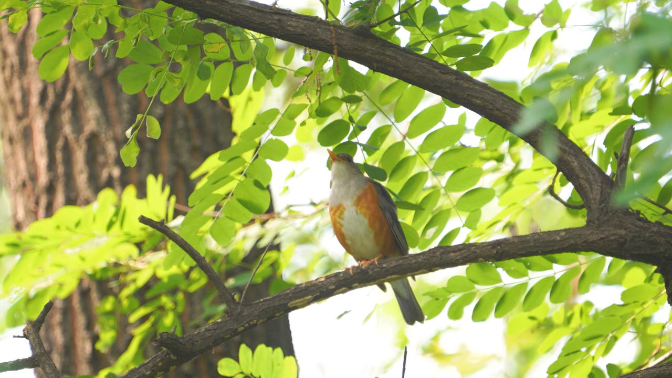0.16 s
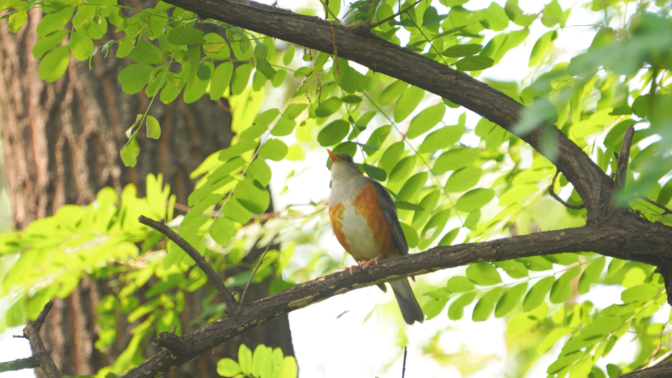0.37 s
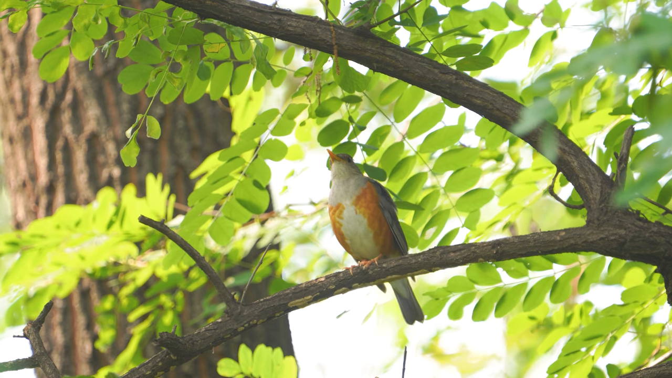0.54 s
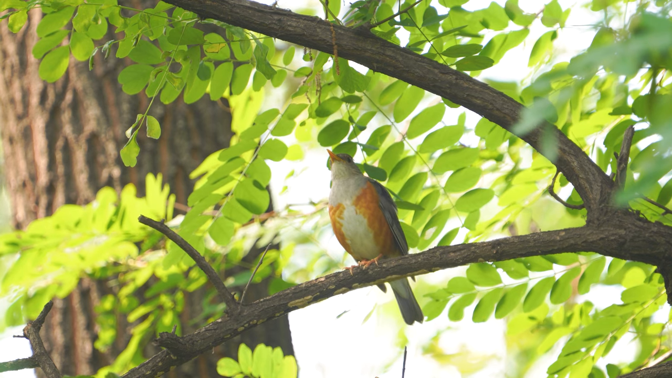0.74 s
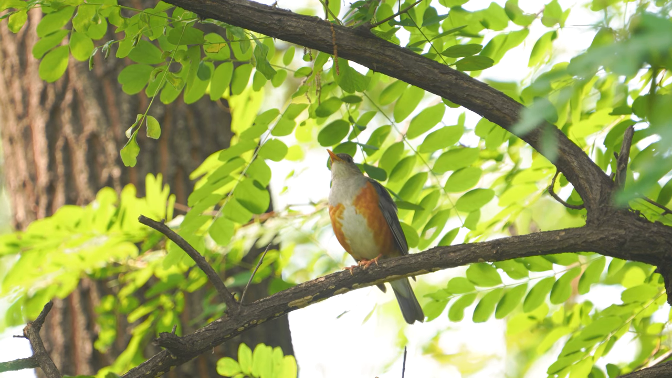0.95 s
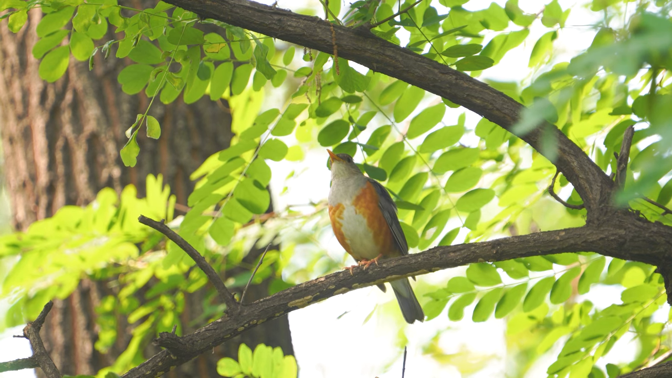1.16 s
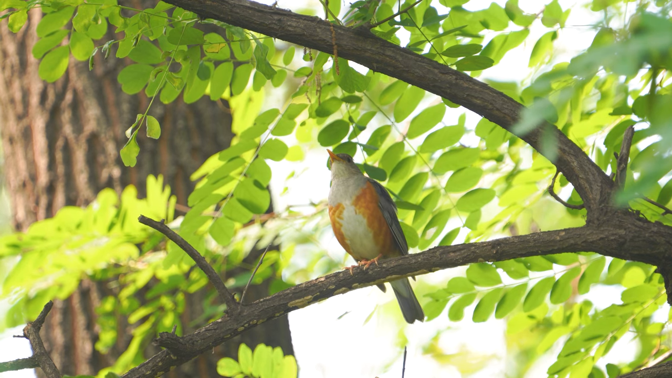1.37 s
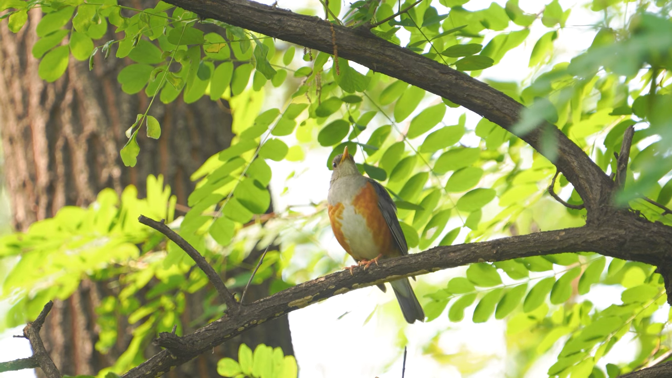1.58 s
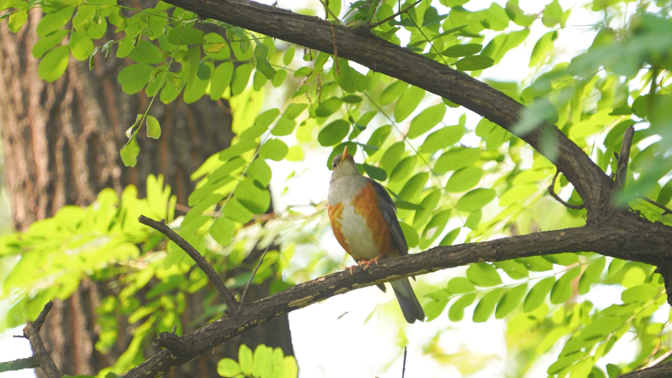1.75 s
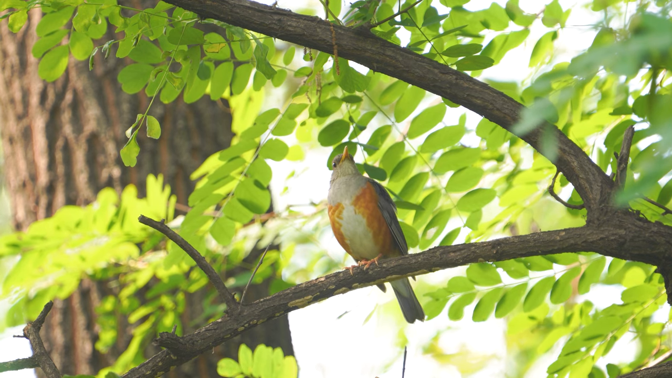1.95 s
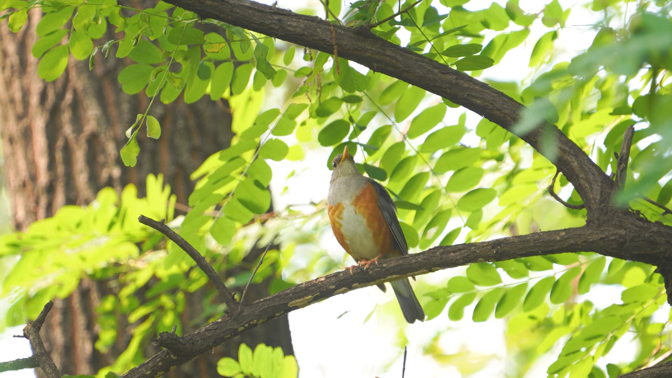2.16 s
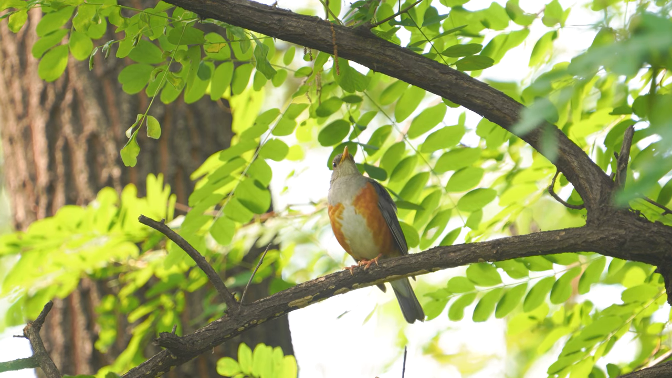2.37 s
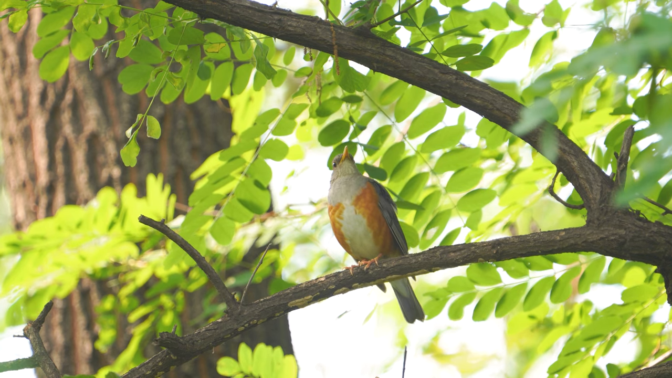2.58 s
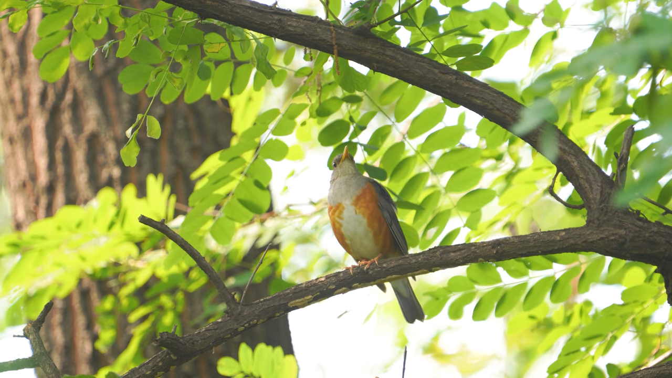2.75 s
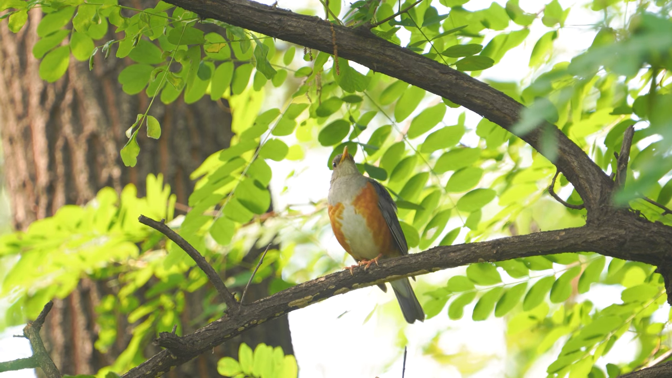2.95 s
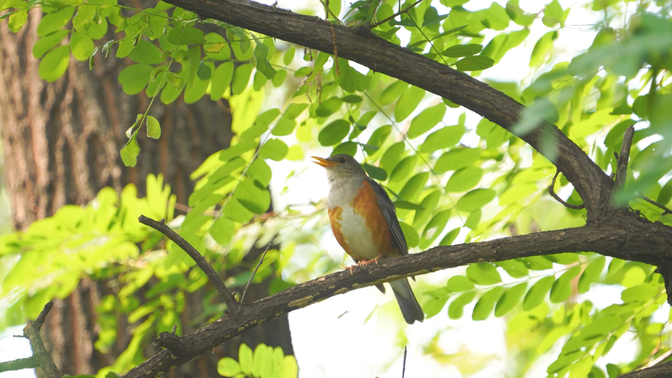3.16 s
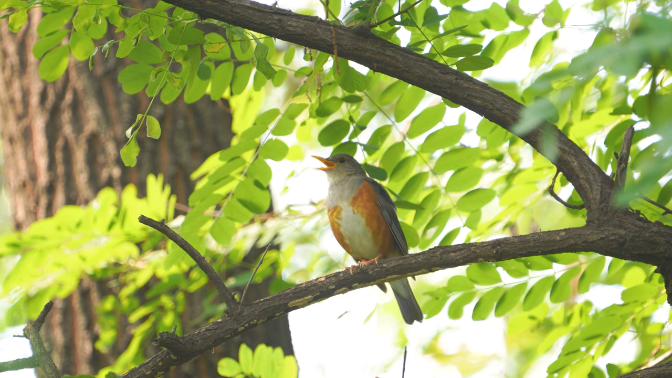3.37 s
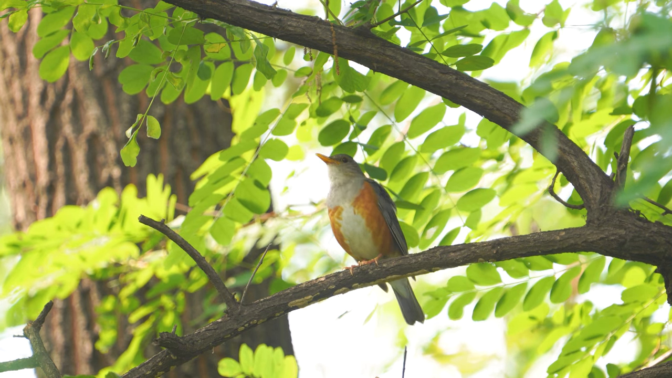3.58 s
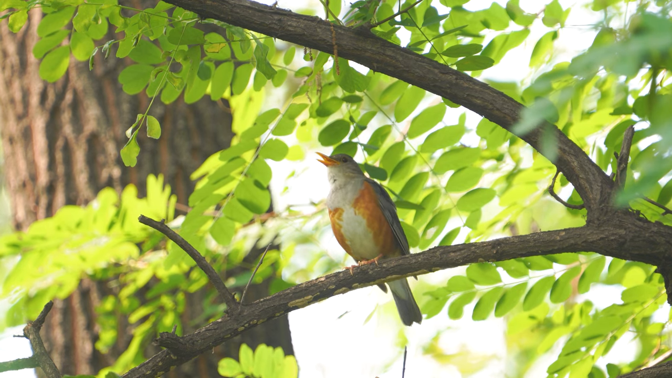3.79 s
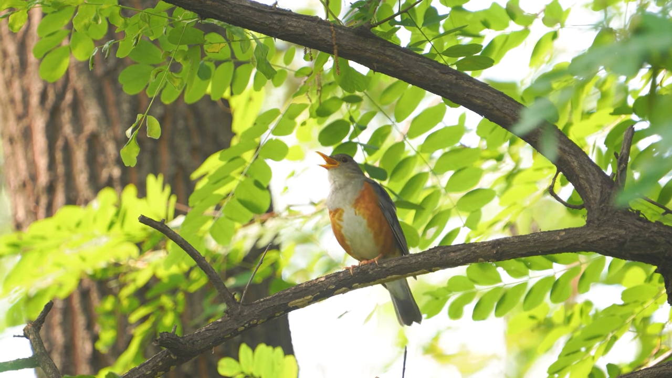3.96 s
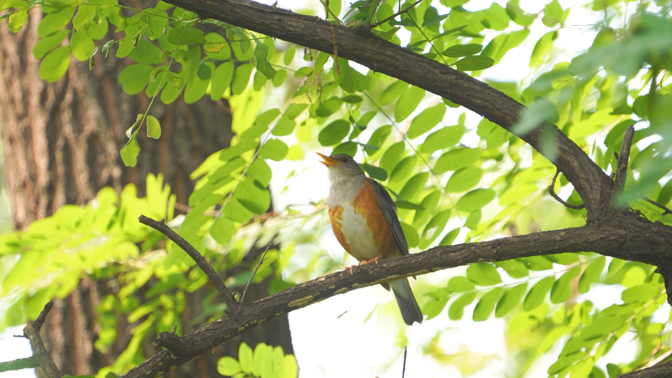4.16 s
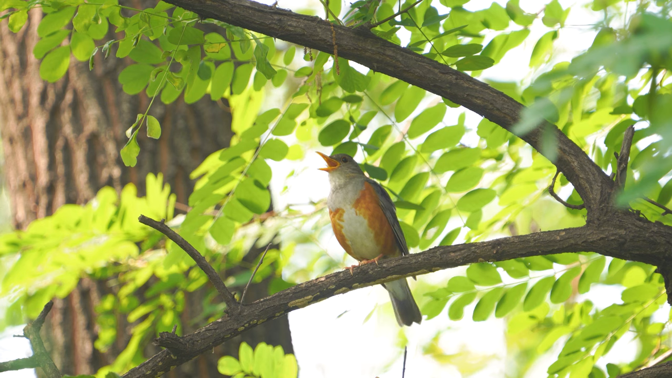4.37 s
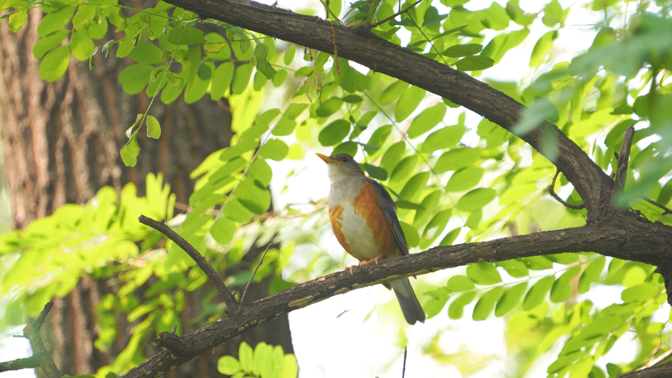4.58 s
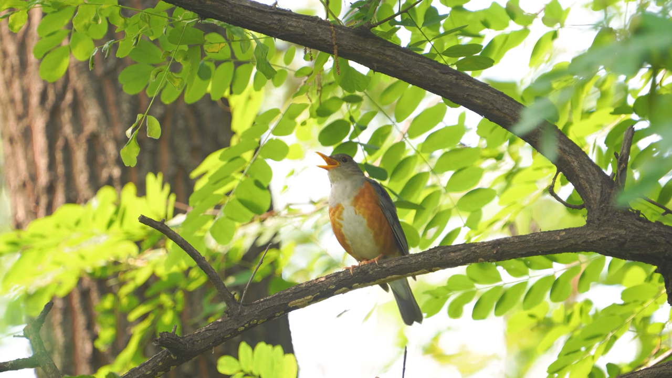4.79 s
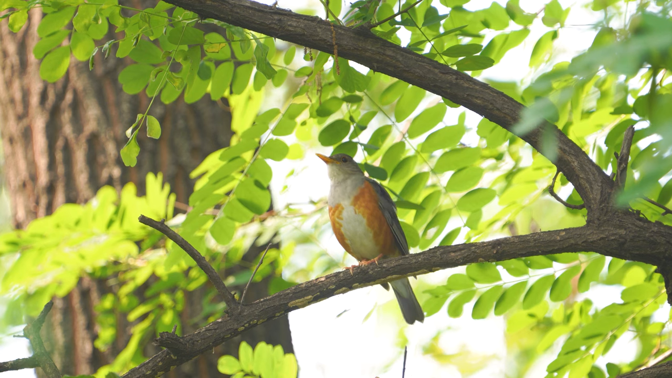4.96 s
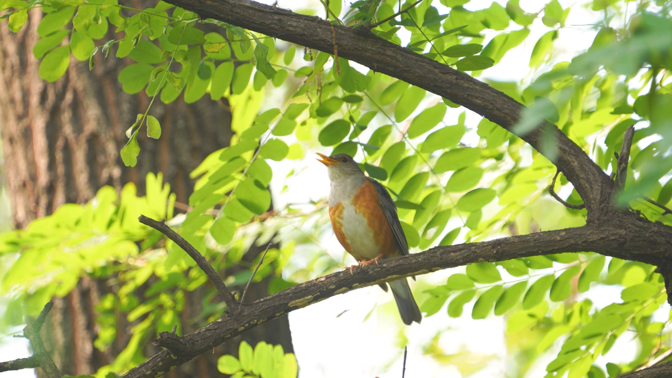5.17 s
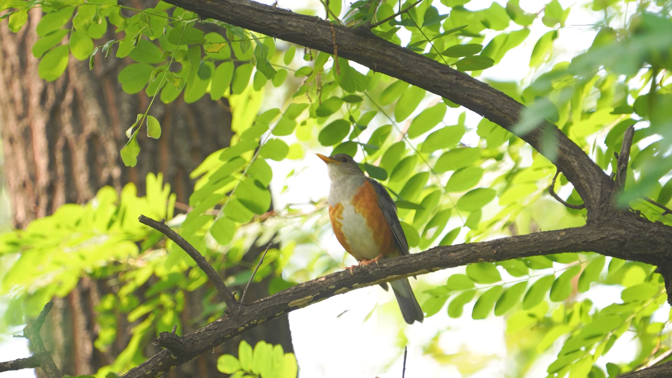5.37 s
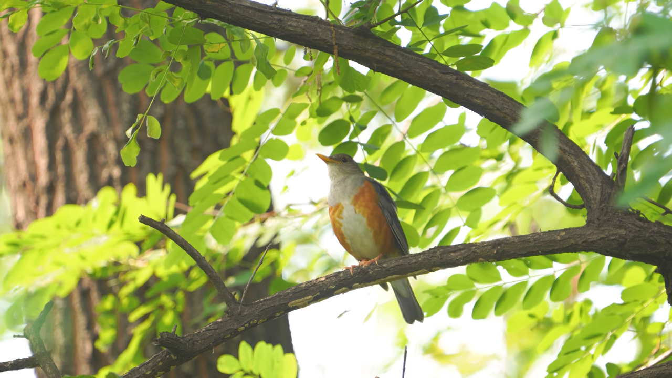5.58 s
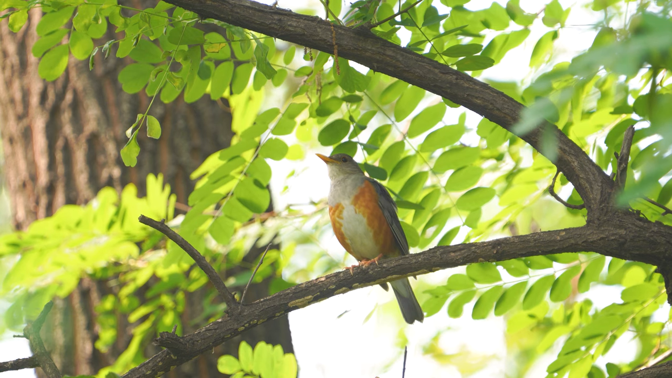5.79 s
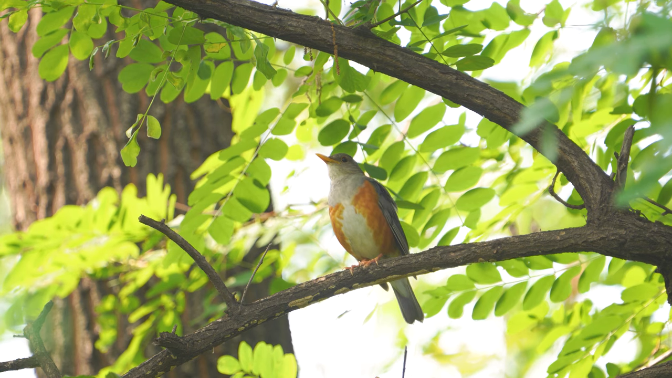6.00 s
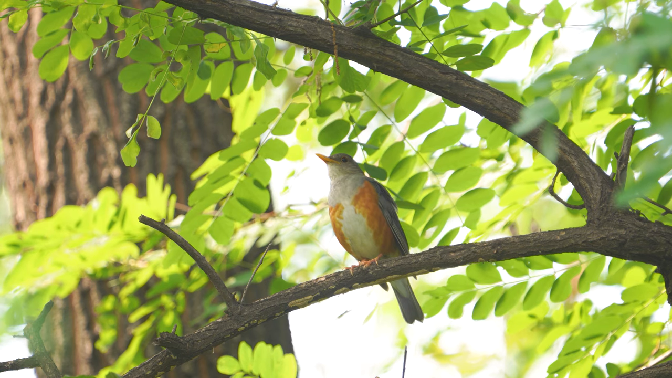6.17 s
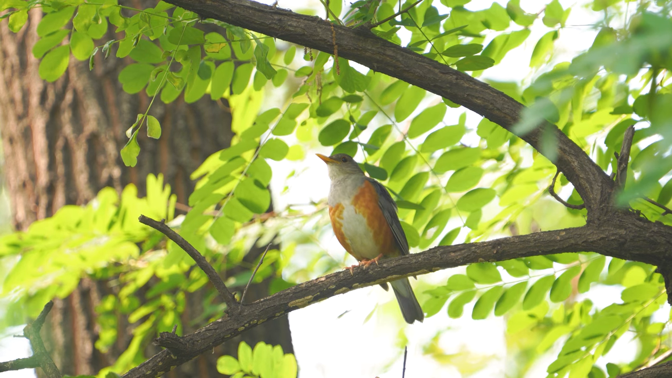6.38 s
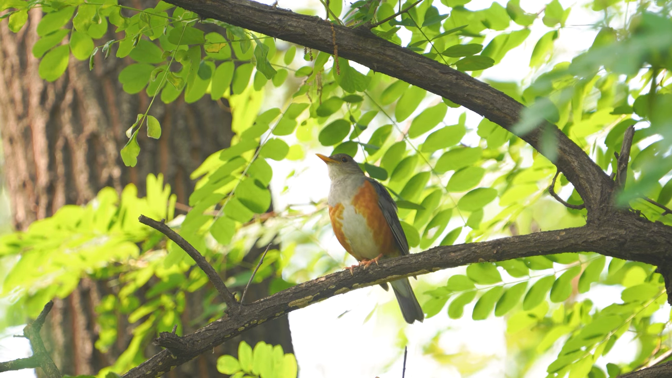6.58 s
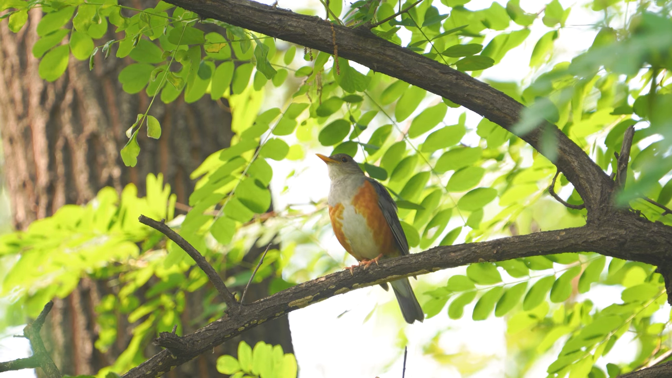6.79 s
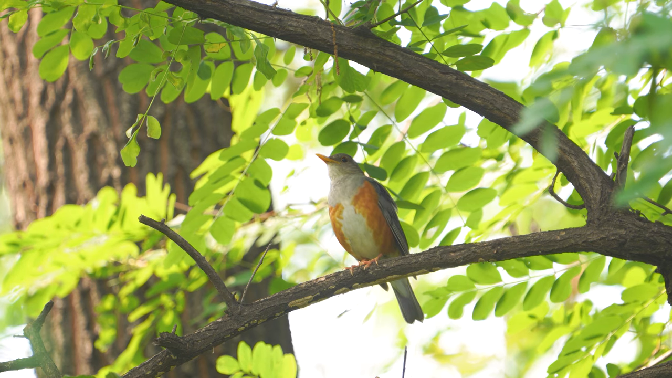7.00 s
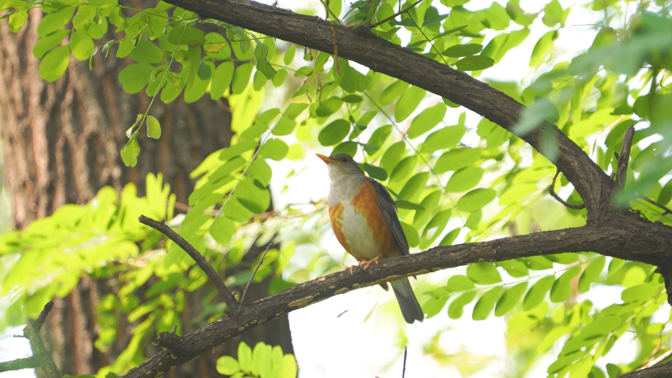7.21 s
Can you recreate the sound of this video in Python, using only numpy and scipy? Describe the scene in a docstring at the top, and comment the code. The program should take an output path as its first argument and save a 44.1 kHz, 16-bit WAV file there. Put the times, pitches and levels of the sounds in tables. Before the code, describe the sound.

Quiet chips, a pause, then a bright burst of bird whistles and rapid trills fading into high twitters, with distant chirps and a faint caw.

```python
"""A thrush sings in a wood: soft chips, four falling slurs, loud whistles, a warble and trills, then a thin twitter.
Its syrinx is a nearly pure gliding tone with weak overtones, and two notes at times sound together.
Leaves and trunks scatter each note into a short tail, built from many small random echoes.
Behind it are distant birds, scattered chirps and a pulsed caw, and a few dry ticks, which are resonant noise bursts.
Faint insects are narrow bands of noise; the air is a low far-off rumble with a little hiss."""
import sys
import numpy as np
from scipy import signal
from scipy.io import wavfile
from scipy.ndimage import uniform_filter1d

SR = 44100
rng = np.random.default_rng(int(sys.argv[2]) if len(sys.argv) > 2 else 0)


def dump_mix(stems):
    """Bounce the given channels to the path in sys.argv[1] as a 16-bit WAV at rate SR."""
    frames = np.atleast_2d(stems).T  # one column per channel
    limited = np.clip(frames, -1, 1)  # hard clip at full scale
    pcm = np.round(limited * 32767).astype(np.int16)
    wavfile.write(sys.argv[1], SR, pcm)


N = 319284
TIME = np.arange(N) / SR
CUTOFF_HZ = 15850


def from_db(db):
    """Decibels to gain."""
    return 10 ** (np.asarray(db) / 20)


def rms_one(x):
    """Scale to rms 1."""
    return x / np.sqrt(np.mean(x ** 2) + 1e-20)


def in_time(rows, at=TIME):
    """Read the columns of a curve at the given times in seconds."""
    s, *columns = np.transpose(rows)
    return [np.interp(at, s, column) for column in columns]


def at_hz(points, hz):
    """Read a spectrum on a log-frequency axis."""
    known_hz, values = np.transpose(points)
    return np.interp(np.log(hz), np.log(known_hz), values)


def panned(pan_db):
    """Left and right gains for a left minus right level in dB."""
    return from_db(np.array([[.5], [-.5]]) * pan_db)


def resonate(x, hz, width_hz):
    """One two-pole resonance with a gain of about 1 at its peak."""
    r = np.exp(-np.pi * width_hz / SR)
    zeros = np.array([1, 0, -1]) * (1 - r * r) / 2
    poles = [1, -2 * r * np.cos(2 * np.pi * hz / SR), r * r]
    return signal.lfilter(zeros, poles, x + 1e-18)


def waver(t, per_s):
    """Random drift around 0 at the times t: straight lines between normal draws of spread 1, per_s a second."""
    knots = rng.standard_normal(4096)
    return np.interp((t - t[0]) * per_s, np.arange(len(knots)), knots)


def scatter(x, t60, first_s, echoes_per_s):
    """Many small echoes that die away by 60 dB in t60 seconds, different at each ear; unit energy."""
    t = TIME[:SR]
    echoes = rng.standard_normal((2, SR)) * (rng.random((2, SR)) < echoes_per_s / SR)
    # silent until first_s, full density of energy from twice that
    echoes *= from_db(-60 * t / t60) * np.clip(t / first_s - 1, 0, 1)
    echoes /= np.sqrt(np.sum(echoes ** 2, axis=1, keepdims=True) + 1e-20)
    return signal.fftconvolve(x[None], echoes, axes=1)[:, :N]


# The bird turns its head. Each row: time in seconds, left minus right level of the song in dB;
# the leaves and the wood follow in proportion.
HEAD_TURN = [(1.0, -4), (2.45, -8), (3.14, -12), (3.23, -3.5), (3.6, -4.5), (4.1, -4), (5.4, -3.5)]
LAG_MS_PER_DB, LAG_FROM_DB, LAG_MAX_MS = 1, -5, .12   # the further right, the later at the left ear
WOOD_T60_S, LEAVES_T60_S = 0.6, 0.1


def thrush():
    """The song reaches the ears directly, off nearby leaves and from the wood; high notes scatter more."""
    low = from_db(-2.08) * (slurs() + trills() + warble() + whistles())
    high = from_db(-3.5) * (chips() + twitter())
    song = low + high
    pan_db, = in_time(HEAD_TURN)
    lag_ms = np.clip(LAG_MS_PER_DB * (LAG_FROM_DB - pan_db), 0, LAG_MAX_MS)
    left_ear = np.interp(TIME - lag_ms / 1000, TIME, song)
    direct = np.array([left_ear, song]) * panned(pan_db)
    to_leaves = from_db(-13) * low + from_db(-9) * high
    to_wood = from_db(-4) * low + from_db(-2.5) * high
    leaves = scatter(to_leaves, LEAVES_T60_S, first_s=.003, echoes_per_s=900)
    wood = scatter(to_wood, WOOD_T60_S, first_s=0.0047, echoes_per_s=1500)
    return direct + leaves * panned(3.1 * pan_db) + wood * panned(0.48 * pan_db)


# The beak opens for the loud middle of the song and lifts the second and third harmonics.
# Each row: time in seconds, gape in dB.
BEAK_GAPE = [(.2, 2), (2.9, -8), (3.15, 13.5), (3.6, 2.5), (4.35, 6.5), (5.4, -15)]


def syrinx(at, hz, level, leak, overtone_db, jitter, rasp_db=-48.0, slope_db=0.0,
           shimmer_db=0.88, mistuned_db=30.0, flicker_db=3.5):
    """A nearly pure, unsteady tone with a trace of rasp; throat and beak colour its weak, flickering overtones."""
    t = at / SR
    gape_db, = in_time(BEAK_GAPE, t)
    # where the pitch dips under the throat's tuning, the overtones stand out
    octaves_under = np.clip(np.log2(np.median(hz) / hz), 0, .5)
    overtone_db = overtone_db + mistuned_db * octaves_under
    phase = 2 * np.pi * np.cumsum(hz * (1 + jitter * waver(t, 607))) / SR
    rasp = resonate(rng.standard_normal(SR), hz=5960, width_hz=2800)[:len(at)]
    tone = np.sin(phase) + from_db(rasp_db) * rasp
    for k in range(2, 7):
        colour_db = at_hz(leak, k * hz) + slope_db * (k - 2) + gape_db * (k < 4)
        colour_db = colour_db + flicker_db * waver(t, 447.6)
        below_cutoff = k * hz < CUTOFF_HZ
        tone += from_db(overtone_db + colour_db) * below_cutoff * np.sin(k * phase)
    out = np.zeros(N)
    out[at] = np.sqrt(2) * level * from_db(shimmer_db * waver(t, 900)) * tone
    return out


def contour(rows, edge_s=0.0046):
    """A note's sample indices, its age in seconds, its soft on-off gate and its smoothed columns."""
    s, *columns = np.transpose(rows)
    first = max(int((s[0] - edge_s / 2) * SR), 0)
    last = min(int((s[-1] + edge_s / 2) * SR), N)
    at = np.arange(first, last)
    age = (at - at[0]) / SR
    to_edge = np.minimum(age, age[-1] - age)
    gate = np.sin(np.pi / 2 * np.clip(to_edge / edge_s, 0, 1)) ** 2
    return at, age, gate, *[uniform_filter1d(np.interp(at / SR, s, c), size=150) for c in columns]


def syllables(shape, renditions):
    """A stock syllable sung several times, moved in start, level, pitch, pace and swell: contours of (s, Hz, dB)."""
    t, hz, db = np.transpose(shape)
    place = (t - t[0]) / (t[-1] - t[0]) - .5
    sung = []
    for s, level_db, ratio, stretch, swell_db in renditions:
        sung.append(np.transpose([s + stretch * t, ratio * hz, level_db + db + swell_db * place]))
    return sung


def plain_notes(notes, leak, **timbre):
    """Notes whose pitch and level simply follow their contours."""
    out = 0
    for rows in notes:
        at, age, gate, hz, db = contour(rows)
        out = out + syrinx(at, hz, gate * from_db(db), leak, **timbre)
    return out


# The low chip flicks up to a crest, dips and recovers.
# Each row: seconds from the crest, pitch in Hz, relative level in dB.
LOW_CHIP_SHAPE = [(-.010, 3800, -28), (-.005, 4510, -11), (0, 6120, -7), (.007, 4780, -1),
                  (.016, 3860, -11.5), (.027, 4550, -0.5), (.039, 4470, -13)]
# Low chips. Each row: crest in seconds, relative level in dB, pitch ratio, time stretch, swell in dB.
LOW_CHIP_TIMES = [(0.216, -39.5, 1.005, 0.98, 3), (.604, -48, 1.0, 1.04, -2), (.962, -48.5, .99, .9, -7)]
# The high chip answers with a crest and a small arch.
# Each row: seconds from the crest, pitch in Hz, relative level in dB.
HIGH_CHIP_SHAPE = [(-.014, 5700, -16), (-.006, 6910, -10), (0, 7480, 3.5), (.007, 5980, -7.5),
                   (.019, 6800, -4.5), (.032, 6450, -4), (.045, 5480, -5)]
# High chips. Each row: crest in seconds, relative level in dB, pitch ratio, time stretch, swell in dB.
HIGH_CHIP_TIMES = [(.423, -43.5, .995, 1.02, 2), (.791, -47.5, 1.01, 0.88, 4)]
# What throat and beak let out of a chip's overtones. Each row: frequency in Hz, gain in dB.
CHIP_COLOUR = [(6800, -4), (8000, 11), (9000, -6.5), (10500, -17), (13000, -4.5), (15500, -25)]


def chips():
    """Low and high chips alternate: quick pitch flicks with raspy tone and steeply falling overtones."""
    notes = syllables(LOW_CHIP_SHAPE, LOW_CHIP_TIMES) + syllables(HIGH_CHIP_SHAPE, HIGH_CHIP_TIMES)
    return plain_notes(notes, CHIP_COLOUR, overtone_db=-6.5, jitter=0.0043, rasp_db=-23, slope_db=-9,
                       mistuned_db=14)


# What throat and beak let out of the overtones of slurs, whistles, trills and far chirps.
# Each row: frequency in Hz, gain in dB.
SONG_COLOUR = [(3800, 14.5), (4600, -3), (6000, -1.5), (7300, -12), (9600, -14.5), (11400, 6.5),
               (12300, -4), (13200, -2), (14300, -6), (15500, -9)]
# The slur falls, levels out and drops away.
# Each row: seconds from its start, pitch in Hz, relative level in dB.
SLUR_SHAPE = [(0, 3325, -2.5), (.041, 2947, 3.5), (.051, 2908, -8), (.062, 2756, 3), (.084, 2416, -4.5),
              (.11, 2307, -5), (.143, 2240, -9), (.162, 1997, -21.5)]
# Four slurs, each louder than the last.
# Each row: start in seconds, relative level in dB, pitch ratio, time stretch, swell in dB.
SLUR_TIMES = [(2.409, -40, 1.023, 0.89, 0), (2.768, -39, .992, 0.98, -7.5), (3.151, -33.5, 1.0, .975, -6),
              (3.508, -27.5, 1.011, 1.025, -0.5)]
SLUR_PURITY = 0.39   # dB that the overtones fall back for each dB a slur is louder


def slurs(hooks_per_s=51, swing_hz=220, stutter_s=0.079, dip_db=7.0, mid_db=-34, mid_overtone_db=-30):
    """Each slur opens with quick upward hooks, quiet on the way down, then settles into a glide."""
    out = 0
    for rows in syllables(SLUR_SHAPE, SLUR_TIMES):
        at, age, gate, hz, db = contour(rows, edge_s=0.0055)
        stutter = np.clip(1.27 * (1 - age / stutter_s), 0, 1)
        turn = 2 * np.pi * hooks_per_s * age
        hz = hz * (1 + 0.0347 * stutter * waver(age, 354))   # pitch is unsteady until the note settles
        hooked_hz = hz - swing_hz * stutter * np.cos(turn)
        level = gate * from_db(db + dip_db * stutter * (np.sin(turn) - 3.0))
        overtone_db = mid_overtone_db - SLUR_PURITY * (db.max() - mid_db)
        out = out + syrinx(at, hooked_hz, level, SONG_COLOUR, overtone_db, jitter=0.0052,
                           rasp_db=-37, slope_db=-1.0)
    return out


SLIDE_POWER = 3.64   # the higher, the more the slides crowd towards a whistle's ends
EFFORT_DB_PER_OCTAVE = 35   # pressure lifts pitch and loudness together


def whistle(s, length, start_hz, held_hz, end_hz, db, swell_db, overtone_db):
    """The pitch slides in, holds and slides out; the level follows the pitch and swells or fades along the note."""
    place = np.linspace(-1, 1, 41)
    outer_hz = np.where(place < 0, start_hz, end_hz)
    hz = held_hz + (outer_hz - held_hz) * np.abs(place) ** SLIDE_POWER
    level_db = db + swell_db * place / 2 + EFFORT_DB_PER_OCTAVE * np.log2(hz / held_hz)
    note = np.transpose([s + length * (place + 1) / 2, hz, level_db])
    return plain_notes([note], SONG_COLOUR, overtone_db=overtone_db, jitter=0.0029, rasp_db=-32.5)


# Clear whistles. Each row: start in seconds, length in seconds, start pitch in Hz, held pitch in Hz,
# end pitch in Hz, relative level in dB, swell in dB, relative overtone level in dB.
WHISTLE_NOTES = [ (3.098, 0.032, 2270, 2485, 2250, -50, 0, -44),
                 (3.138, 0.023, 2380, 2400, 2230, -43.5, 1, -43),
                 (3.169, 0.022, 2310, 2346, 2250, -38.5, -7, -38),
                 (3.198, 0.02, 2290, 2323, 2246, -35, 2, -45),
                 (3.286, 0.034, 3060, 3100, 3190, -43.5, 13, -40),
                 (3.322, 0.015, 3310, 3386, 3280, -41.5, -4, -34),
                 (3.334, 0.062, 2720, 2722, 2730, -41, -12, -42),
                 (4.044, .027, 3130, 3190, 3020, -33, 10, -37),
                 (4.075, .012, 3000, 3416, 3130, -30.5, 8, -34),
                 (4.086, 0.021, 2835, 2756, 2720, -30.5, -2, -33),
                 (4.105, .038, 2695, 2715, 2840, -35, -10, -33),
                 (4.146, 0.13, 2680, 2095, 2060, -49.5, -9, -41),
                 (4.445, 0.068, 1950, 1840, 1790, -62, 6, -45)]


def whistles():
    """Single whistles, each sliding to its held pitch and away."""
    return sum(whistle(*row) for row in WHISTLE_NOTES)


# A chain of like arches. Each row: start in seconds, length in seconds, top in Hz, relative level in dB.
WARBLE_ARCHES = [(3.859, .028, 2530, -33.5), (3.891, 0.028, 2391, -30), (3.923, 0.033, 2384, -31.5),
                 (3.956, 0.03, 2320, -30.5)]
WARBLE_START_HZ, WARBLE_END_HZ, WARBLE_OVERTONE_DB = 2137, 1865, -37


def warble():
    """Arched whistles in a quick chain, all starting and ending on the same pitches."""
    return sum(whistle(s, length, WARBLE_START_HZ, top_hz, WARBLE_END_HZ, db, 0, WARBLE_OVERTONE_DB)
               for s, length, top_hz, db in WARBLE_ARCHES)


TRILL_ATTACK_S, TRILL_ATTACK_DB, TRILL_RELEASE_DB = 0.018, 5, 6.5
TRILL_GLIDE_S, TRILL_SAG_S = 0.037, 0.0116   # time constant of the glide, length of the final sag


def trill_course(s, length, start_hz, goal_hz, sag_hz, swing_hz, calm_s, db, release_s):
    """A trill nears its goal while its swing narrows, and sags as it stops: a contour of (s, Hz, dB, swing Hz)."""
    age = np.linspace(0, length, 60)
    left = length - age
    glide_hz = goal_hz + (start_hz - goal_hz) * np.exp(-age / TRILL_GLIDE_S)
    hz = glide_hz - sag_hz * np.clip(1 - left / TRILL_SAG_S, 0, 1)
    attack_db = TRILL_ATTACK_DB * np.clip(1 - age / TRILL_ATTACK_S, 0, 1)
    release_db = TRILL_RELEASE_DB * np.clip(1 - left / release_s, 0, 1)
    return np.transpose([s + age, hz, db - attack_db - release_db, swing_hz * np.exp(-age / calm_s)])


# Trilled notes. Each row: start in seconds, length in seconds, start pitch in Hz, goal pitch in Hz,
# final sag in Hz, initial pitch swing in Hz, its decay in seconds, relative level in dB, release in seconds.
TRILL_NOTES = [ (3.672, 0.18, 2376, 3230, 3, 320, 0.059, -42.5, 0.075),
               (4.313, 0.075, 2430, 2533, 330, 425, 0.059, -31, 0.013),
               (4.393, 0.026, 2573, 1845, 102, 170, 0.062, -38, 0.0086),
               (4.414, .065, 2411, 3118, 654, 400, 0.024, -28.5, 0.013),
               (4.475, 0.0566, 2793, 3113, 0, 151, 0.044, -30, .003),
               (4.531, 0.07, 3115, 3180, 0, 30, 0.052, -38.5, .035)]


def trills(swings_per_s=80, throb_db=1.5):
    """The pitch swings rapidly and a little unevenly; the tone is loudest at the top of each swing."""
    out = 0
    for row in TRILL_NOTES:
        at, age, gate, hz, db, swing_hz = contour(trill_course(*row))
        pace = swings_per_s * (1 + .16 * waver(age, 120))
        swing = -np.cos(2 * np.pi * np.cumsum(pace) / SR)
        level = gate * from_db(db - 3 + throb_db * swing)
        swung_hz = hz + swing_hz * swing * from_db(2 * waver(age, 89.0))
        out = out + syrinx(at, swung_hz, level, SONG_COLOUR, overtone_db=-33, jitter=0.011,
                           rasp_db=-43, shimmer_db=0.04)
    return out


# The other side of the syrinx sweeps up as each twitter begins.
# Each row: seconds from its start, pitch in Hz, relative level in dB.
UPSWEEP_SHAPE = [(0, 3960, -10.5), (.011, 5000, -2.5), (.021, 5300, 1.5), (.031, 5430, 0)]
# Upsweeps. Each row: start in seconds, relative level in dB, pitch ratio, time stretch, swell in dB.
UPSWEEP_TIMES = [(4.777, -41.5, 0.99, 1.0, 5), (5.170, -58, .61, .9, -22)]
# The long arch climbs, holds its top and plunges.
# Each row: seconds from its start, pitch in Hz, relative level in dB.
LONG_ARCH_SHAPE = [(0, 3174, -20), (.019, 3670, -18), (.032, 4650, -1), (.052, 5210, 4), (.075, 5690, -1.5),
                   (.093, 5866, -3), (.115, 5870, 1.5), (.129, 5760, -0.5), (.146, 3140, -15)]
# Long arches. Each row: start in seconds, relative level in dB, pitch ratio, time stretch, swell in dB.
LONG_ARCH_TIMES = [(4.784, -36, 1.0, 1.0, -2.5), (5.181, -45, 0.97, 1.03, -13.5)]
# A short arch follows each long one.
# Each row: seconds from its start, pitch in Hz, relative level in dB.
SHORT_ARCH_SHAPE = [(0, 3324, -25), (.011, 4400, -8.5), (.021, 5060, -2), (.031, 5223, 2.5),
                    (.039, 4780, -6.5), (.047, 2930, -21)]
# Short arches. Each row: start in seconds, relative level in dB, pitch ratio, time stretch, swell in dB.
SHORT_ARCH_TIMES = [(4.931, -33, 1.0, 0.97, 2), (5.340, -43.5, 0.98, .99, -9)]
# What throat and beak let out of the twitter's overtones. Each row: frequency in Hz, gain in dB.
TWITTER_COLOUR = [(6300, 1), (8500, 6), (10300, -11), (11700, 2.5), (12600, -8), (14500, -14), (15500, -20)]


def twitter():
    """Thin high arches, with both sides of the syrinx sounding together at the start of each twitter."""
    notes = syllables(UPSWEEP_SHAPE, UPSWEEP_TIMES)
    notes += syllables(LONG_ARCH_SHAPE, LONG_ARCH_TIMES)
    notes += syllables(SHORT_ARCH_SHAPE, SHORT_ARCH_TIMES)
    return plain_notes(notes, TWITTER_COLOUR, overtone_db=-17.0, jitter=0.0018, rasp_db=-18.0)


# Distant small birds. Each row: start in seconds, length in seconds, start pitch in Hz, end pitch in Hz,
# relative level in dB.
CHIRP_NOTES = [(0.0, 0.011, 1880, 1945, -48.5), (1.93, .14, 7040, 7600, -82),
               (2.04, 0.046, 3590, 3990, -75), (5.70, 0.05, 7070, 5040, -76.5),
               (6.03, 0.053, 7000, 4760, -79), (6.623, 0.056, 7530, 5160, -76),
               (6.936, 0.039, 7750, 5660, -75), (7.044, 0.034, 7200, 4780, -74.5)]
# One hoarse caw far away. Each row: time in seconds, mean pulses per second, level in dB.
CAW_COURSE = [(5.97, 238.3, -59), (6.03, 286.9, -53.5), (6.07, 304, -54), (6.11, 285.4, -56.5),
              (6.15, 250, -68)]
# The caw's throat, each resonance passed twice.
# Each row: frequency in Hz, width of one pass in Hz, relative level in dB.
CAW_RESONANCES = [(1255, 260, 2.8), (1524, 140, 4.9), (1750, 140, 3.9)]


def far_birds():
    """Gliding chirps and a caw of uneven pulses in a throat, so far off that only their scattered sound arrives."""
    chirps = 0
    for s, length, start_hz, end_hz, db in CHIRP_NOTES:
        at, age, gate, hz = contour([(s, start_hz), (s + length, end_hz)])
        chirps = chirps + syrinx(at, hz, gate * from_db(db), SONG_COLOUR, overtone_db=-47, jitter=0.0265)
    at, age, gate, per_s, db = contour(CAW_COURSE)
    cycles = np.floor(np.cumsum(per_s * (1 + 0.17 * waver(age, 300))) / SR)
    pulses = np.diff(cycles, prepend=0)
    cry = 0
    for hz, width, mode_db in CAW_RESONANCES:
        cry = cry + from_db(mode_db) * resonate(resonate(pulses, hz, width), hz, width)
    caw = np.zeros(N)
    caw[at] = rms_one(cry) * gate * from_db(db)
    far_chirps = from_db(4.5) * scatter(chirps, t60=0.53, first_s=0.00099, echoes_per_s=1400)
    far_caw = scatter(caw, t60=0.55, first_s=0.001, echoes_per_s=1200) * panned(-8.5)
    return far_chirps + far_caw


# Dry ticks among the twigs.
# Each row: start in seconds, relative level in dB, centre in Hz, 60 dB decay of the burst in seconds.
TWIG_TICKS = [(.122, -43, 690, 0.0089), (.193, -51, 7000, .005), (0.7698, -43, 6000, 0.0063),
              (1.861, -60, 7500, 0.0075), (1.886, -57.5, 1880, 0.044), (1.907, -51.5, 1570, 0.017),
              (3.840, -49, 6800, 0.0059), (6.698, -63, 1700, .025), (7.083, -59, 1700, .02),
              (7.147, -58, 1600, .02), (7.197, -59.5, 1600, .02)]


def ticks(body_db=-2.0):
    """Each tick is a burst that dies at once in a broad resonance, with a weaker body below it."""
    out = np.zeros(N)
    for s, db, hz, t60 in TWIG_TICKS:
        decay = from_db(-60 * np.clip((TIME - s) / t60, 0, 4))
        burst = rng.standard_normal(N) * (TIME >= s) * decay
        body = resonate(burst, 0.85 * hz, 0.46 * hz)
        snap = resonate(burst, hz, .5 * hz) + from_db(body_db) * body
        # a soft contact has little treble
        soft = signal.butter(2, min(2 * hz, CUTOFF_HZ), fs=SR, output="sos")
        out += from_db(db) * signal.sosfilt(soft, snap) * np.sqrt(SR / (np.pi * hz))
    scattered = scatter(out, t60=.4, first_s=0.0037, echoes_per_s=2300)
    return out * panned(-6.5) + from_db(-4) * scattered


# Insect bands. Each row: frequency in Hz, nominal width in Hz, relative level in dB.
INSECT_BANDS = [(4060, 40, -76), (4454, 47, -77)]
# The insects swell, then sink back a little. Each row: time in seconds, gain in dB.
INSECT_COURSE = [(0, -5.5), (2.4, -3.5), (5.5, 1), (6.4, -1), (7.2, -3)]


def insects():
    """Two thin bands of shrilling, noise through paired resonances, that waver in strength."""
    out = 0
    for hz, width, db in INSECT_BANDS:
        noise = rng.standard_normal((2, N))
        shrill = resonate(resonate(noise, hz, 2 * width), hz, 2 * width)
        out = out + from_db(db + 1.5 * waver(TIME, 9.8)) * rms_one(shrill)
    swell_db, = in_time(INSECT_COURSE)
    return out * from_db(swell_db)


# The air of the wood. Each row: frequency in Hz, relative level per Hz in dB.
AIR_SPECTRUM = [(25, -16), (40, -3.5), (65, -1.5), (130, -6), (290, -6), (480, -7.5), (650, -11.5),
                (1080, -16), (1700, -19), (2560, -24), (3700, -26.5), (6000, -31.5), (9000, -35),
                (15500, -38.5)]
# How alike the air is at both ears. Each row: frequency in Hz, left-right likeness from 0 to 1.
AIR_LIKENESS = [(60, .999), (130, .98), (290, .93), (640, .68), (1400, .45), (3100, .45), (6800, .15),
                (15000, .05)]
# The lean of the air. Each row: frequency in Hz, left minus right level in dB.
AIR_LEAN = [(60, 0), (130, .2), (300, 1.7), (640, 3.5), (1400, 2.5), (3100, 0), (15000, 0)]
# The slow swell of the air. Each row: time in seconds, gain in dB.
AIR_SWELL = [(0, 1.3), (1.3, -1), (2.5, -0.16), (4, 1), (5.5, -0.5), (7.2, -1.5)]
AIR_DB = -57.5   # level before the swell


def air(patchy_db=1.7):
    """Far rumble and faint hiss in half-octave noise bands, alike at both ears in the bass, arriving from the left."""
    out, edges = 0, np.geomspace(22, 17000, 20)
    white = rng.standard_normal((2, 2, N))
    for k, (low, high) in enumerate(zip(edges, edges[1:])):
        band = signal.butter(2, [low, high], "band", fs=SR, output="sos")
        mid, side = signal.sosfilt(band, white[k % 2])   # neighbouring bands use different noise
        hz = np.sqrt(low * high)
        alike = at_hz(AIR_LIKENESS, hz)
        level = from_db(at_hz(AIR_SPECTRUM, hz) + patchy_db * waver(TIME, 7))
        spread = np.sqrt((1 - alike) / (1 + alike)) * side * [[1], [-1]]
        out = out + level * panned(at_hz(AIR_LEAN, hz)) * (mid + spread)
    out = np.array([out[0], np.roll(out[1], 6)])   # the right ear hears it 6 samples later
    swell_db, = in_time(AIR_SWELL)
    return from_db(AIR_DB + swell_db) * out / np.std(out.mean(axis=0))


def scene():
    """The thrush in front, the wood around it."""
    return thrush() + far_birds() + ticks() + insects() + air()


def record(dry):
    """The top is cut steeply."""
    steep = signal.ellip(12, .1, 80, CUTOFF_HZ, fs=SR, output="sos")
    return signal.sosfilt(steep, dry)


dry = scene()
out = record(dry)
dump_mix(out)
```